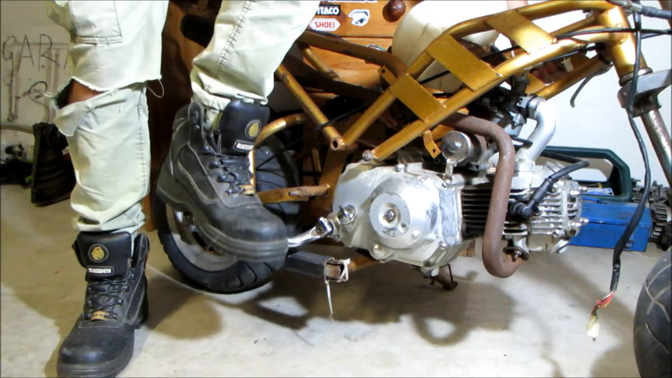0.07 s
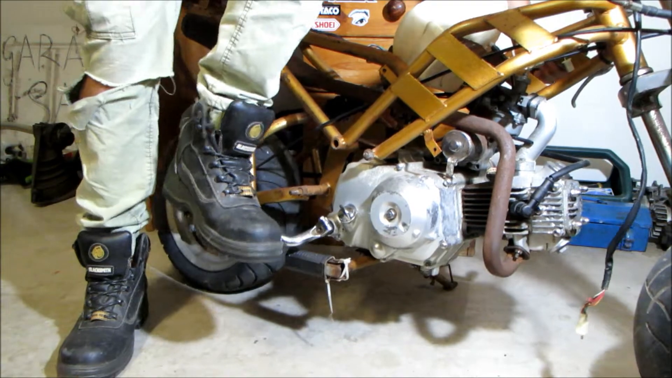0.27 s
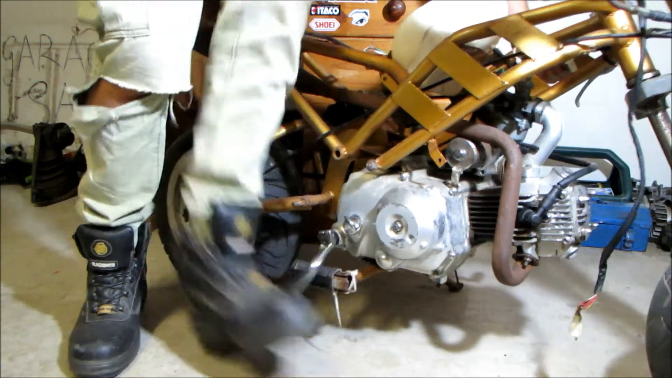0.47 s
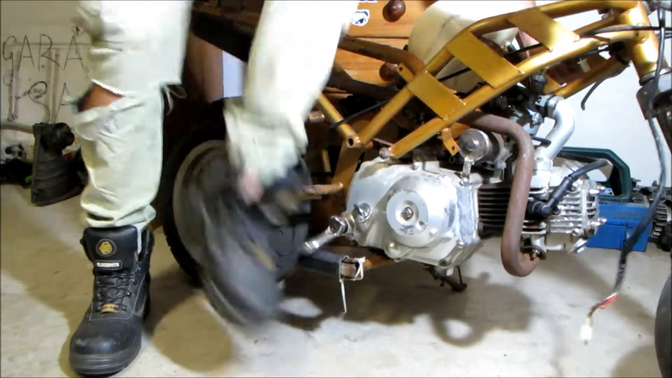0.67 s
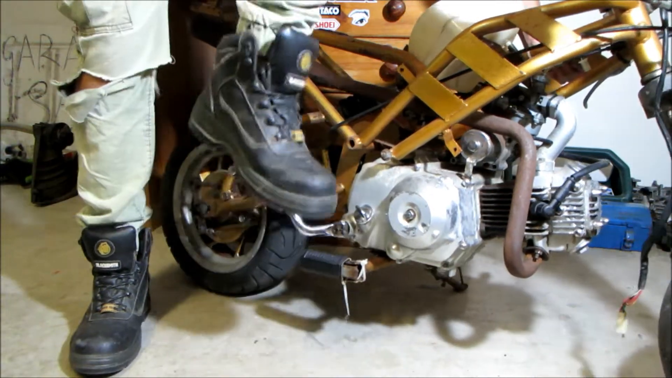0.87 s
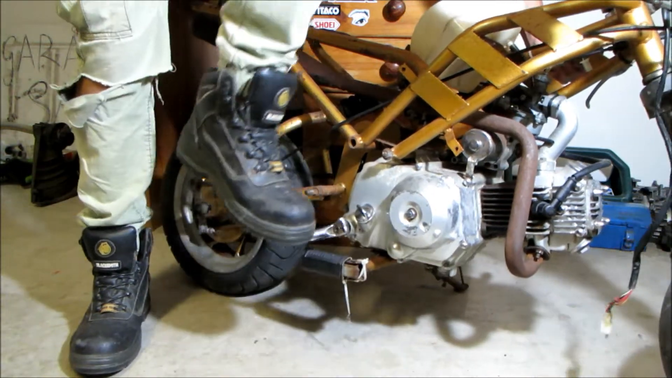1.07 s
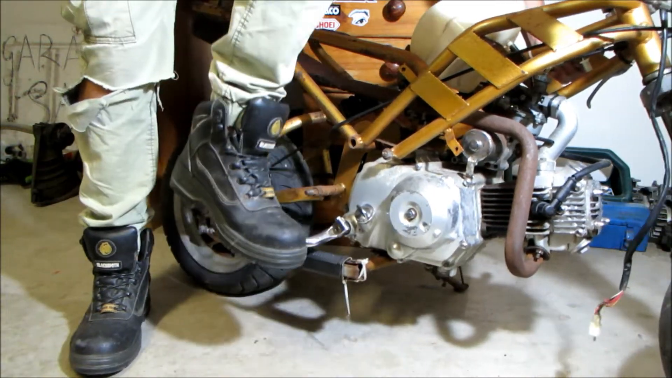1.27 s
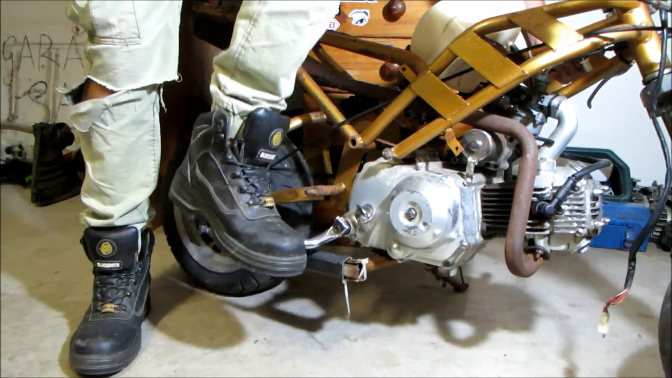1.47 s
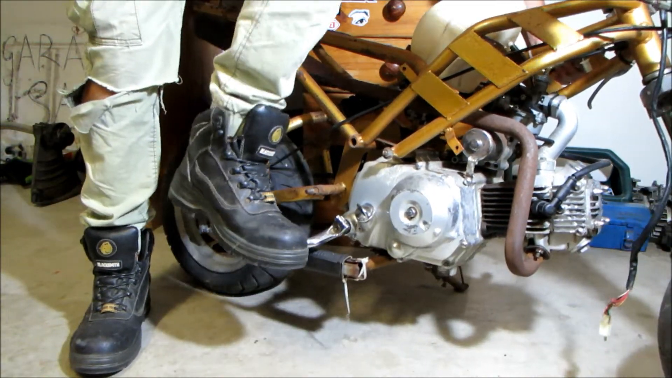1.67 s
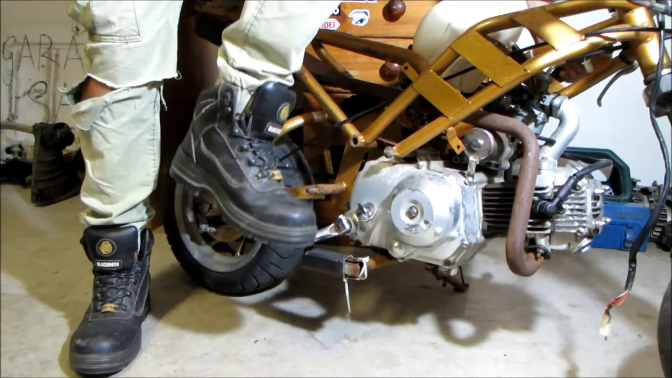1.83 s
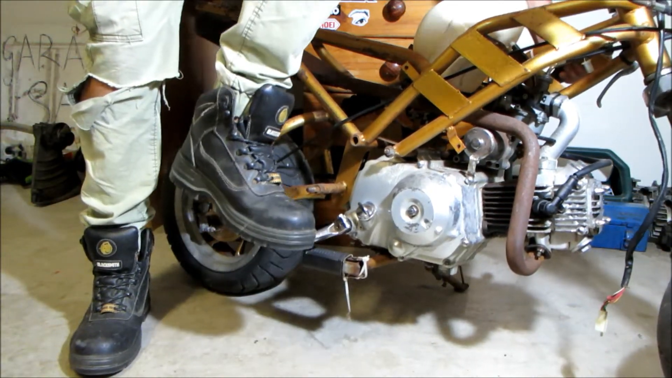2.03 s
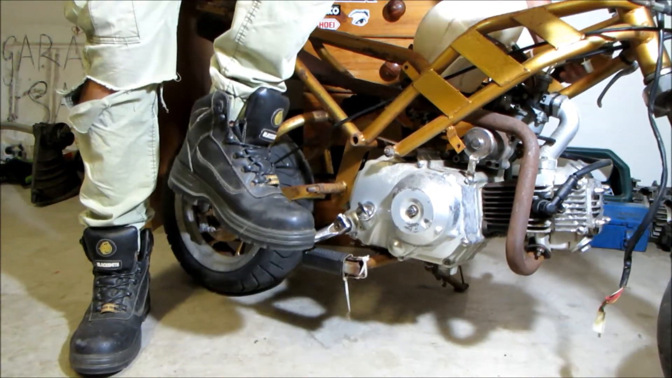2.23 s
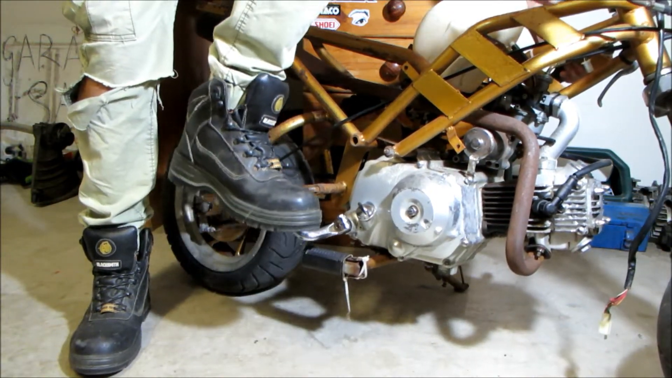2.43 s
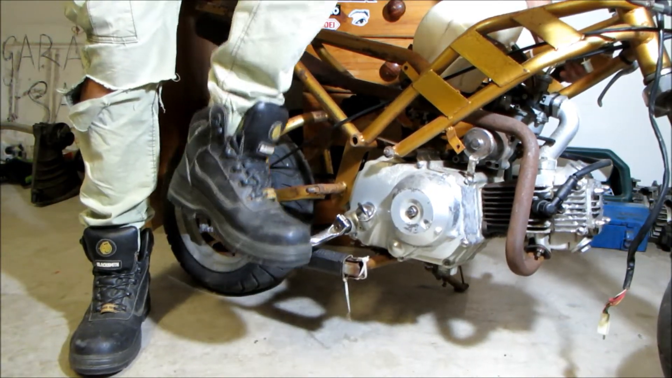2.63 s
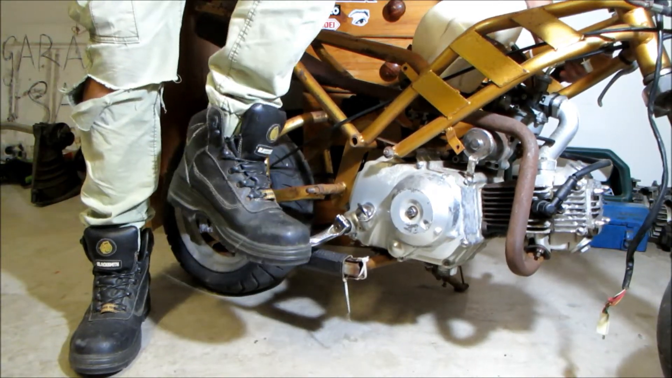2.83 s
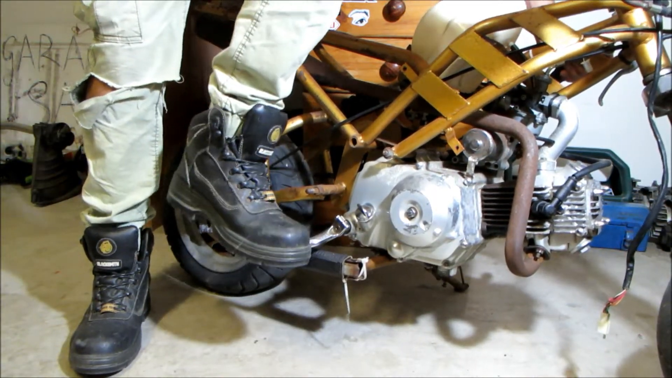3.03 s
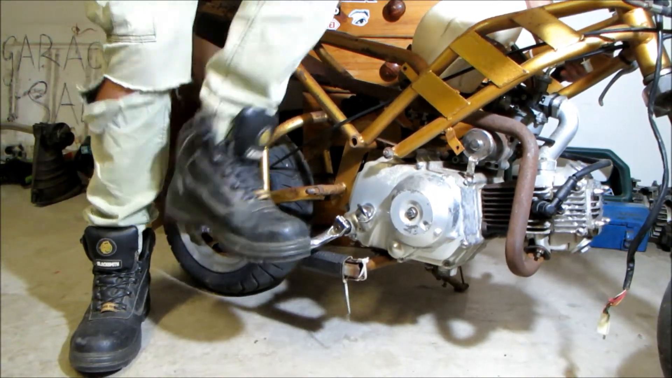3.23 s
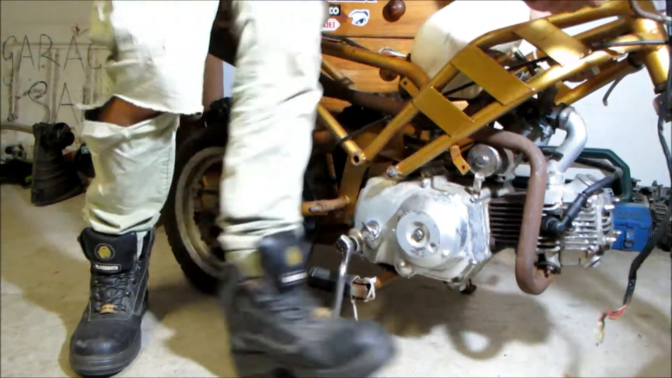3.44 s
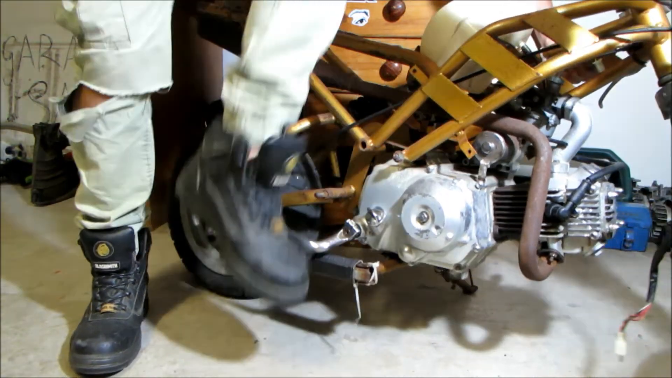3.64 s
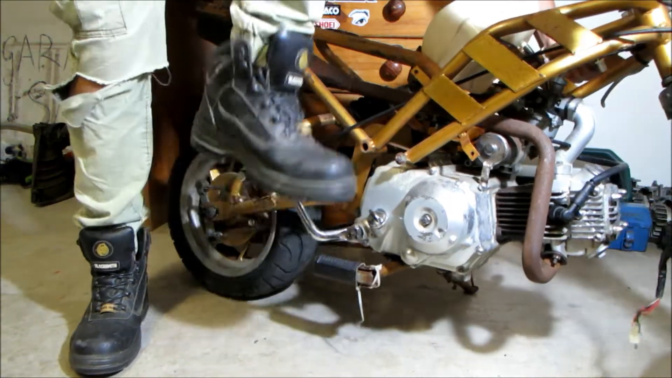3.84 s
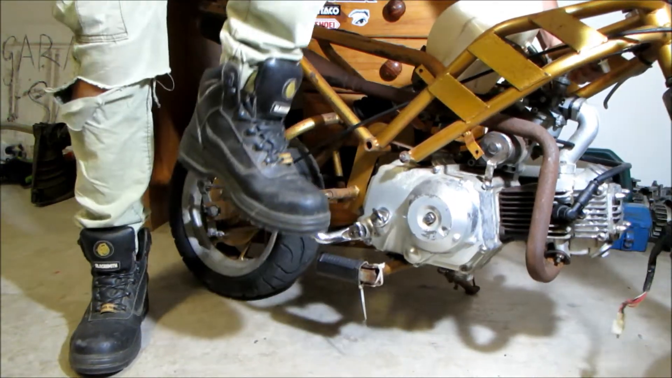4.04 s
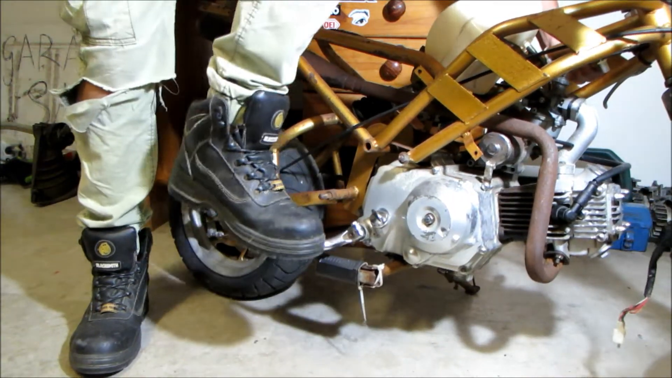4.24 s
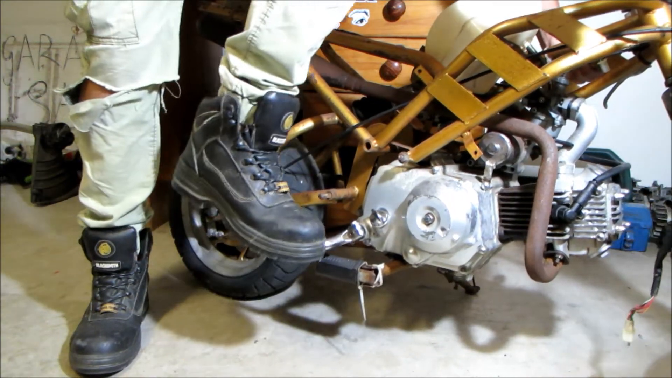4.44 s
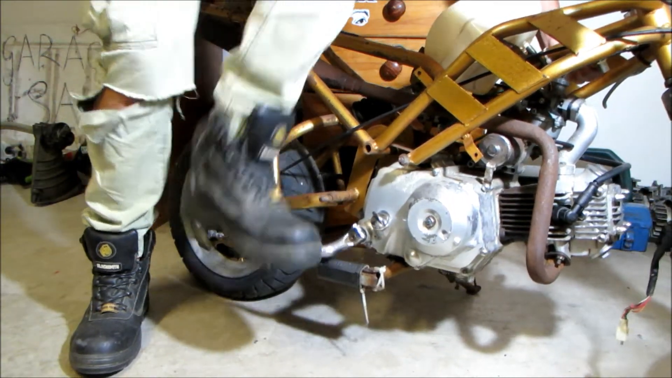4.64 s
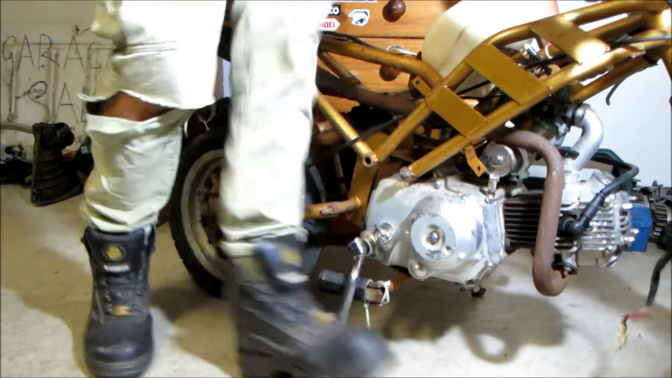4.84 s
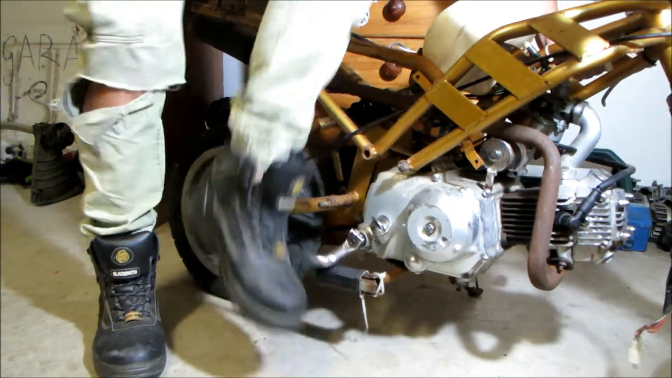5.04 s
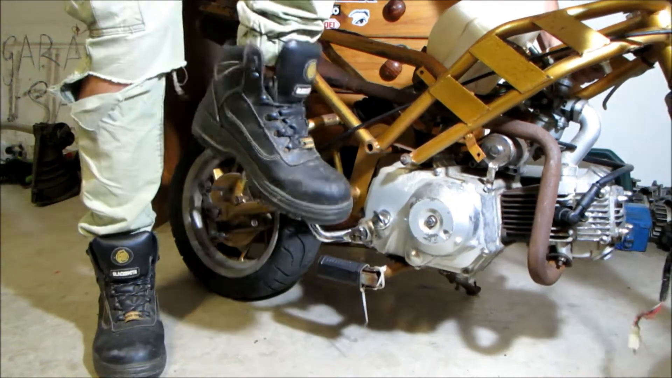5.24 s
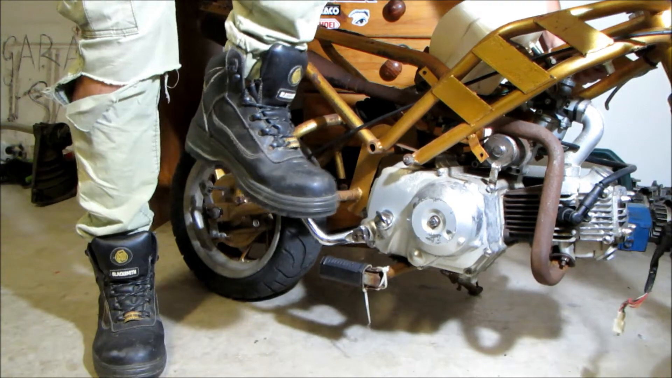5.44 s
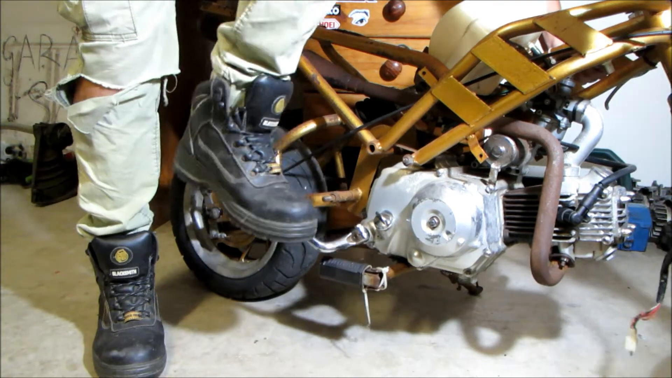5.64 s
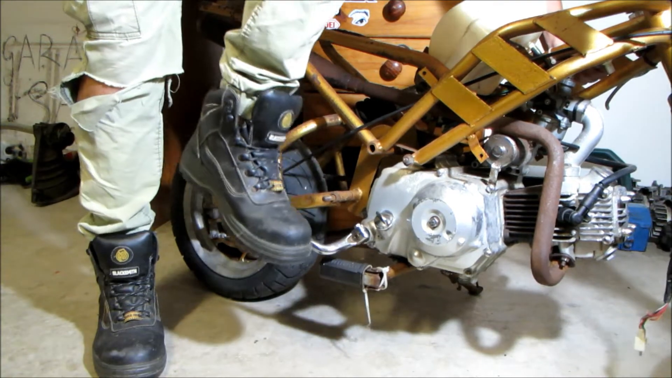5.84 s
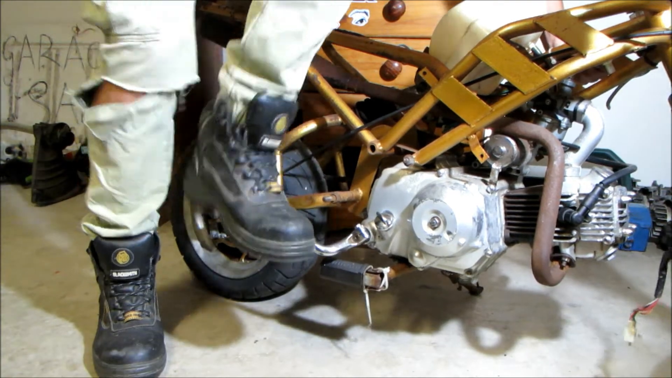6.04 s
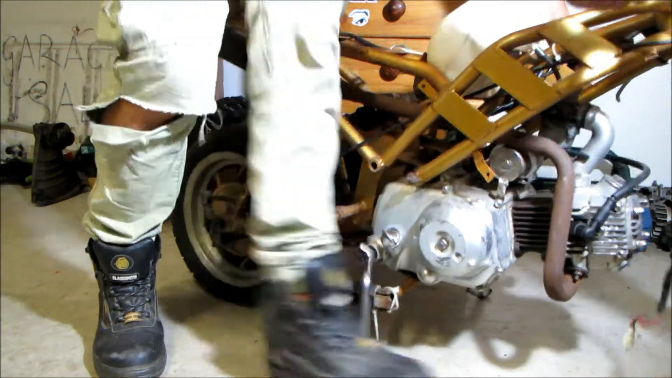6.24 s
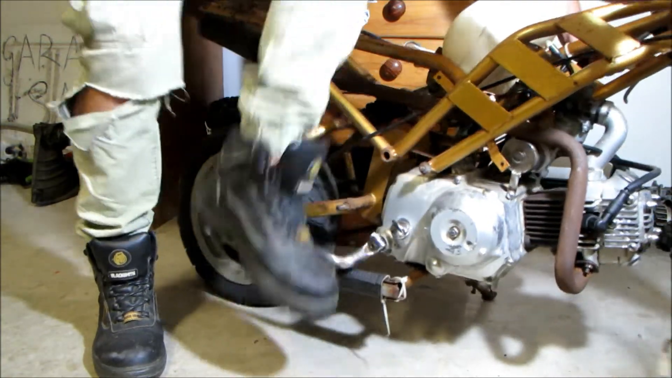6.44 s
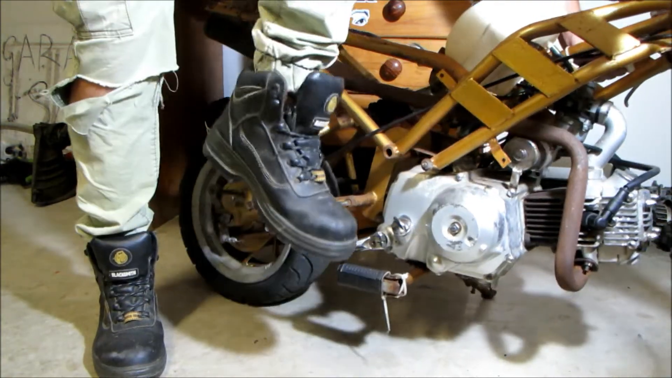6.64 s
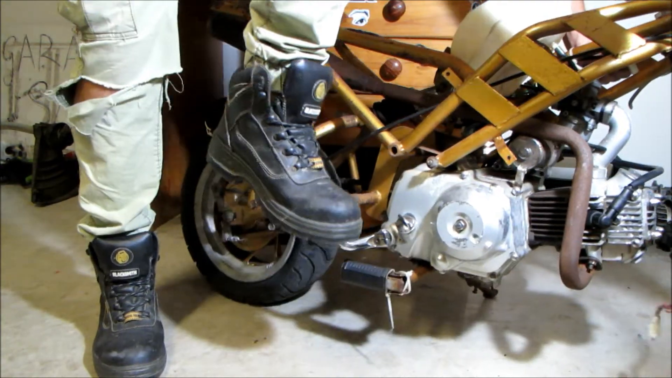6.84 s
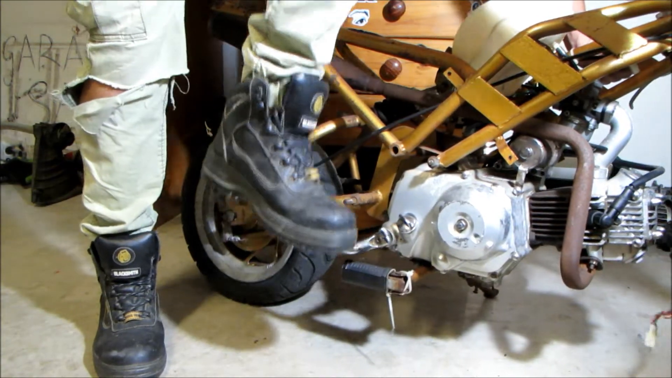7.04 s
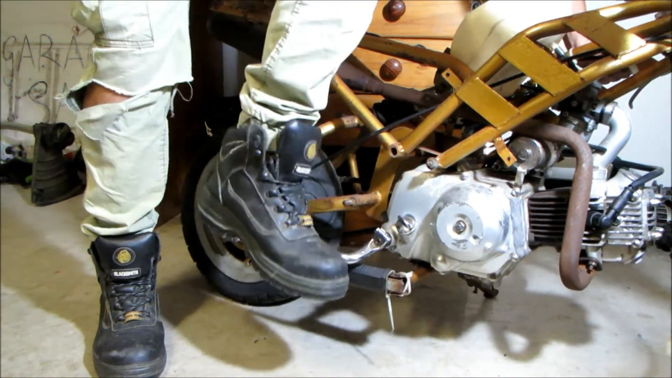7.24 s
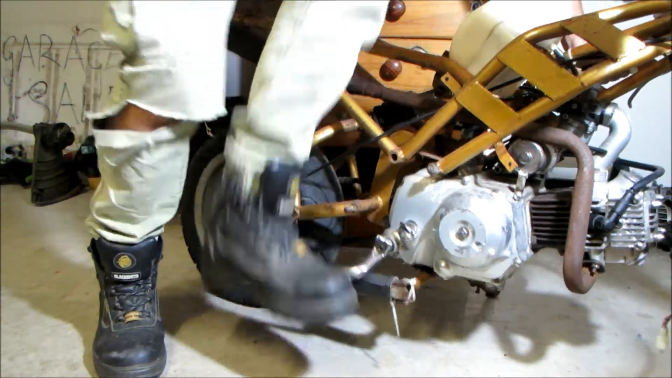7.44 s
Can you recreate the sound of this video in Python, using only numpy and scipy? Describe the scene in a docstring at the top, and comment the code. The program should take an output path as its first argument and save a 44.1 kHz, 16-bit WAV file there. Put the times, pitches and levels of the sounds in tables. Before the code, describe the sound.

Metal kick lever clacks, a little engine turns over with low slowing puffs, whirring gears and rapid ratchet clicks, then stops dead, four times

```python
"""In a shed, a small four-stroke pocket bike is kicked over four times and never fires.
Each kick: the lever takes up with a clack, the piston pumps a few slowing gulps of air (decaying low
tones and rushing noise), the gears whirr (grainy noise) and the starter ratchet clicks (noise snaps
through the crankcase modes); then the lever rattles back up. In the pause the boot shifts on the pedal."""
import sys
import numpy as np
from scipy import signal
from scipy.fft import rfft, irfft
from scipy.io import wavfile
from scipy.ndimage import map_coordinates

SR = 44100
rng = np.random.default_rng(int(sys.argv[2]) if len(sys.argv) > 2 else 0)


def int16_out(signal):
    """Quantize to a 16-bit WAV file."""
    q = np.round(np.clip(np.atleast_2d(signal).T, -1, 1) * 32767)
    wavfile.write(sys.argv[1], SR, q.astype(np.int16))


N = 330750
TIME = np.arange(N) / SR  # s
HZ = np.maximum(np.arange(4097) * SR / 8192, 1)  # frequency grid of the filters

# colour of the ratchet teeth: f/Hz, level/dB
TOOTH_COLOUR = [(300, -21.5), (900, -11), (1500, -2.5), (2100, -11.5), (2800, -3), (3700, -13),
                (4600, -2.5), (5800, 4), (8000, 3), (9500, 1.5), (11500, -9), (15500, -18)]
# crankcase modes: f/Hz, width/Hz, level over the broad colour/dB
CASE_MODES = [(521, 48, 0.5), (975.5, 25, 8), (1335, 4.7, 1), (1444, 28, 5.5), (2082, 29, 4),
              (2353, 34, 1.5), (2830, 23, -6.5), (4640, 69, -5), (5945, 66, 2), (7070, 40, 4.5),
              (7620, 120, 3), (9100, 30, -5)]


def ratchet(snap_db=-2.0, hold=0.0009, fade=0.0022, grit_db=-5.0, chatter_db=-19, chatter_fade=0.011):
    """Every tooth drops with the same sharp snap, its own grit and a brief chatter in the crankcase."""
    drops = teeth()
    one_snap = (bursts([(0, snap_db, hold, fade)], rise=.00012) * noise())[:SR // 32]
    snaps = convolve(strikes(drops), one_snap)
    grit = bursts([(s, db + grit_db, hold, fade) for s, db in drops], rise=0.00017)
    chatter = bursts([(s, db + chatter_db, hold, chatter_fade) for s, db in drops], rise=0.0027)
    return colour(snaps + (grit + chatter) * stereo_noise(), TOOTH_COLOUR, CASE_MODES)


TOOTH_SPREAD_DB = 1.5  # unevenness from tooth to tooth
# the ratchet overruns once a kick: from t/s, until t/s, first gap between teeth/s,
# shortening as it spins up/s, lengthening per tooth/s, first tooth level/dB, loss per tooth/dB
# (levels before the trims in ratchet)
OVERRUN_RUNS = [(.6637, .817, .0184, .0311, .00251, -16.5, .06),
                (3.5644, 3.79, .0239, .0314, .00202, -16.8, .17),
                (4.9669, 5.208, .0202, .0203, .00121, -16.8, .38),
                (6.379, 6.605, .0165, .0186, .00141, -17.6, .18)]


def teeth(count=24, spin_up_count=4):
    """Ratchet teeth (t/s, level/dB) crowd together on spin-up, then spread and weaken on the coast."""
    rows, k = [], np.arange(count)
    for start, end, first_gap, shortening, lengthening, first_db, loss_db in OVERRUN_RUNS:
        gaps = first_gap - shortening * (1 - np.exp(-k / spin_up_count)) + lengthening * k
        levels = first_db - loss_db * k + TOOTH_SPREAD_DB * rng.standard_normal(count)
        times = start + np.cumsum(gaps) - gaps
        rows += [(s, db) for s, db in zip(times, levels) if s < end]
    return rows


# the lever clacking as it takes up, returns or is nudged:
# t/s, body level/dB, bright edge level/dB, fading time/s (levels before the trims below)
LEVER_CLACKS = [(0.041, -46.5, -66, 0.0082), (.474, -33, -34, 0.0043), (1.0823, -33, -36, 0.0066),
                (1.2637, -42.5, -34, 0.004), (1.84, -55.5, -63.5, 0.0076), (2.048, -35, -39, .0085),
                (2.71, -46.5, -54, .0027), (3.303, -45, -54.5, 0.0092), (3.412, -23.5, -19, 0.005),
                (4.0647, -36, -37, .0027), (4.113, -39.5, -43, .0038), (4.803, -28, -30, 0.0059),
                (5.362, -44.5, -39, 0.0067), (5.8, -47.5, -58, 0.0068), (6.159, -30.5, -46, 0.00053),
                (6.267, -37.5, -41, .005), (6.97, -39, -42, 0.023), (7.1844, -35.5, -38, 0.0057)]
# the lever and its casing ringing on: f/Hz, level relative to the blow/dB, fading time/s
LEVER_RING = [(976, 3, .12), (1495, -2, 0.079), (2370, -1, .09), (5010, -6, .13), (5378, -5.5, .11),
              (6000, -3.5, 0.069), (6837, -5, 0.068), (7280, -4, .1), (8592, -9.5, .06)]
# colour of the knock: f/Hz, level/dB
CLACK_BODY_COLOUR = [(100, -17), (400, -5), (750, -7.5), (1100, -1), (1800, 0), (2300, -1.5), (2850, 1),
                     (3600, -13.5), (6000, -28)]
# colour of the bright edge, and of the leaking air: f/Hz, level/dB
CLACK_EDGE_COLOUR = [(1500, -13.5), (3800, -11), (5000, 3.5), (6200, 4.5), (7700, 0), (10000, -6.5),
                     (12000, -18), (15500, -19.5)]
# blows at the end stop, before the trims below
STOP_BODY_DB, STOP_EDGE_DB, STOP_FADE_S = -22, -22, .0035


def clacks(body_db=1.5, edge_db=2.0, hold=0.0012, graze_fade=0.01, ring_db=-23):
    """Steel on steel: a casing knock, a bright edge, faint lever ringing and a graze before each stop."""
    end_blows = [(s, STOP_BODY_DB, STOP_EDGE_DB, STOP_FADE_S) for s, *_ in END_STOPS]
    blows = LEVER_CLACKS + end_blows
    grazes = [(s - length, db, length / 2, graze_fade) for s, _, length, db in END_STOPS]
    knocks = [(s, low + body_db, hold, fade) for s, low, high, fade in blows]
    edges = [(s, high + edge_db, hold, fade) for s, low, high, fade in blows]
    body = bursts(knocks, rise=0.0013)
    edge = bursts(edges + grazes, rise=0.00014)
    ring_blows = strikes([(s, high + ring_db) for s, low, high, fade in LEVER_CLACKS])
    ring = convolve(ring_blows, ringing(LEVER_RING))
    knock = colour(body * noise(), CLACK_BODY_COLOUR, CASE_MODES)
    return knock + colour(edge * stereo_noise(), CLACK_EDGE_COLOUR, CASE_MODES) + ring


# the lever reaching the bottom of its travel:
# t/s, ping level/dB, length of the graze before it/s, graze level/dB
END_STOPS = [(0.62, -25.5, 0.013, -23), (3.515, -26, 0.0045, -35), (4.9234, -34, 0.015, -33),
             (6.338, -31, 0.027, -31.5)]


def stops(hz=2640, width=260, hold=0.0054, fade=0.011):
    """The lever strikes its end stop and the shaft pings: a burst of noise in one narrow resonance."""
    return bursts([(s, db, hold, fade) for s, db, *_ in END_STOPS], rise=0.00072) * narrow(hz, width)


# the pipe's pitch sags as the engine slows: Hz, and Hz per (cycle/s)
PIPE_HZ, PIPE_HZ_PER_SPEED = 82.9, 1.25
# colour of the rushing flow: f/Hz, level/dB
RUSH_COLOUR = [(30, -40), (55, -23.5), (75, -12.5), (135, -1.5), (270, 1), (390, -2), (520, -8), (800, -15),
               (2000, -37.5)]


def gulps(second_ratio=1.94, overtone_ratio=2.04, overtone_db=-5, pipe_fade=0.029, second_fade=0.015,
          pipe_rise=0.022, waver=0.23):
    """In each gulp the air column swings in two low modes with an overtone, and the flow rushes."""
    pipe, age, rows = np.zeros(N), TIME[:SR // 4], strokes()
    for s, length, speed, pipe_db, second_db, rush_db in rows:
        hz = PIPE_HZ + PIPE_HZ_PER_SPEED * speed
        first_level = from_db(pipe_db) * swell(age, pipe_rise, length, pipe_fade)
        first = first_level * np.sin(2 * np.pi * hz * age)
        phase = 2 * np.pi * second_ratio * hz * age
        second_level = from_db(second_db) * swell(age, 0.0036, length, second_fade)
        second = second_level * (np.sin(phase) + from_db(overtone_db) * np.sin(overtone_ratio * phase))
        start = round(s * SR)
        pipe[start:start + len(age)] -= first + second
    flow = bursts([(s, rush_db, length / 2, .016) for s, length, *_, rush_db in rows], rise=0.019)
    wavering = 1 + waver * narrow(28, 13)
    return np.sqrt(2) * pipe * wavering + colour(flow * noise(), RUSH_COLOUR)


GULP_S, FIRST_GULP_S = 0.04, 0.033
# the kicks: lever takes up t/s, first gulp t/s, engine speed/(cycles/s), whirr under the push level/dB,
# rumble under the push level/dB, first gulp level/dB, whine level/dB, casing ring level/dB
# (whine and ring before the trims in gears)
KICK_ROWS = [(.474, .568, 10.642, -52, -44, -28, -31, -28),
             (3.412, 3.481, 10.139, -39.5, -36, -24, -30.5, -42),
             (4.803, 4.870, 10.844, -48, -40, -33, -29, -42.5),
             (6.158, 6.278, 11.283, -53, -40.5, -33, -35, -45)]
# later gulps by engine speed: speed/(cycles/s), pipe level/dB, second mode level/dB, rush level/dB
LATER_GULPS = [(5, -40.5, -48.5, -38), (7.5, -39.5, -45, -47.5), (9.5, -37, -39.5, -45.5)]


def strokes(second_db=-2, rush_db=3.5):
    """Gulps, one a cycle: the boot drives the first, the rest follow the engine's speed."""
    # rows: t/s, length/s, speed/(cycles/s), pipe level/dB, second mode level/dB, rush level/dB
    rows, (speeds, *levels) = [], np.transpose(LATER_GULPS)
    for _, start, speed, _, _, db, *_ in KICK_ROWS:
        rows.append((start, FIRST_GULP_S, speed, db, db + second_db, db + rush_db))
        for s, now in cycles(start, speed)[1:]:
            rows.append((s, GULP_S, now, *(np.interp(now, speeds, column) for column in levels)))
    return rows


FRICTION, STALL_SPEED = 13.125, 4.1  # cycles/s lost per second, cycles/s


def cycles(start, speed):
    """Friction slows the engine evenly until it stalls against compression: t/s and speed per cycle."""
    speeds = np.sqrt(np.arange(speed ** 2, STALL_SPEED ** 2, -2 * FRICTION))
    return [(start + (speed - now) / FRICTION, now) for now in speeds]


LEAK_BELOW_SPEED, LEAK_AFTER_CYCLES = 7.2, .32  # cycles/s, cycles after the gulp
LEAK_S, LEAK_DB = 0.041, -40


def leaks(rise=0.01, fade=0.0099):
    """Air squeezed past the slowing piston as it climbs against compression: a short hiss."""
    slow = [(s + LEAK_AFTER_CYCLES / speed, LEAK_DB, LEAK_S, fade)
            for s, _, speed, *_ in strokes() if speed < LEAK_BELOW_SPEED]
    return colour(bursts(slow, rise) * noise(), CLACK_EDGE_COLOUR)


# colour of the gear whirr: f/Hz, level/dB
WHIRR_COLOUR = [(500, -27.5), (900, -2), (1200, 3), (1800, 1.5), (2800, -0.5), (3700, -20), (5500, -4),
                (8000, -9.5), (11000, -11.5), (15500, -28.5)]
# colour of the low gear rumble, and of the boot's scuffs: f/Hz, level/dB
RUMBLE_COLOUR = [(60, -18), (150, 1), (260, 1.5), (420, 0.5), (530, 0), (680, -6.5), (900, -3.5),
                 (1500, -23.5)]


def gears(whine_db=-5.0, whine_after=0.15, whine_width=0.04, ring_db=-5.5, ring_after=0.23, ring_width=.065,
          push_ring_db=-2.5, drone_db=-46.5, drone_after=0.18, drone_width=0.099):
    """Gear teeth and cam chain patter on the casing; the gears whine and two low casing modes sing."""
    take_ups, starts, _, push_whirr, push_rumble, _, whines, rings = np.transpose(KICK_ROWS)
    whirr = drive(push_whirr, spin_db=-40, spin_after=0.17, spin_width=0.093,
                  coast_db=-46.5, coast_fade=0.055, push_fade=0.014)
    rumble = drive(push_rumble, spin_db=-43.5, spin_after=.17, spin_width=.12,
                   coast_db=-51, coast_fade=0.12, push_fade=0.067)
    patter = whirr * grain(per_s=600, spread_db=4.5, fade=0.00092) * noise()
    whine = hump(zip(starts, whines + whine_db), whine_after, whine_width) * narrow(1468, 190)
    loaded = bursts([(s, db + push_ring_db, .02, .15) for s, db in zip(take_ups, push_whirr)], rise=.008)
    spinning = hump(zip(starts, rings + ring_db), ring_after, ring_width)
    ring = (loaded + spinning) * narrow(983.6, 40)
    drone = hump([(s, drone_db) for s in starts], drone_after, drone_width) * narrow(528, 22)
    low = colour(rumble * noise(), RUMBLE_COLOUR, CASE_MODES)
    return colour(patter, WHIRR_COLOUR, CASE_MODES) + low + whine + ring + drone


def drive(push_levels, spin_db, spin_after, spin_width, coast_db, coast_fade, push_fade, quiet_speed=4.6):
    """Gear noise level: steady under the push, a swell after the first gulp, a lingering coast."""
    push = [(take_up, db, start - take_up, push_fade)
            for (take_up, start, *_), db in zip(KICK_ROWS, push_levels)]
    coast = [(start, coast_db, (speed - quiet_speed) / FRICTION, coast_fade)
             for _, start, speed, *_ in KICK_ROWS]
    spin = hump([(start, spin_db) for _, start, *_ in KICK_ROWS], spin_after, spin_width)
    return bursts(push, rise=.012) + bursts(coast, rise=.05) + spin


# the boot leans on the pedal around each take-up (level before the trim below)
LEAN_ON_S, LEAN_ON_DB = 0.0083, -53
# the lever scraping round on its shaft; the long row at 2.808 s is a very faint grainy noise
# through the pause: t/s, length/s, level before the trim below/dB
GRAINY_SCRAPES = [(0, 0.053, -53), (1.076, 0.17, -40.5), (2.638, 0.064, -57), (2.699, 0.021, -55),
                  (2.808, 0.93, -74), (4.064, 0.085, -40), (5.361, 0.15, -42.5), (6.99, 0.055, -37.5),
                  (7.182, 0.069, -55)]
# colour of the scraping: f/Hz, level/dB
SCRAPE_COLOUR = [(80, -33.5), (220, -3), (350, -6), (500, -2.5), (680, -8), (1000, -4), (1500, -1.5),
                 (2100, -0.5), (2900, -4.5), (3800, -18), (5500, -9), (8000, -11.5), (11000, -23),
                 (15500, -37.5)]


def lever(scrape_db=-2.5, rise=0.005, fade=0.074):
    """The lever grates in small uneven slips, noise in tiny contacts; a very faint grain fills the pause."""
    scraping = bursts([(s, db, length, fade) for s, length, db in GRAINY_SCRAPES], rise)
    leaning = hump([(take_up, LEAN_ON_DB) for take_up, *_ in KICK_ROWS], 0, LEAN_ON_S)
    grains = (scraping + leaning) * grain(per_s=460, spread_db=-0.5, fade=0.0027) * noise()
    return from_db(scrape_db) * colour(grains, SCRAPE_COLOUR, CASE_MODES)


# the boot sole bumping the pedal: t/s, level before the trim below/dB
BOOT_THUMPS = [(.070, -43.5), (0.488, -39.5), (6.159, -29.5), (6.173, -35), (7.19, -47.5)]
# the frame answering those bumps: f/Hz, level relative to the bump/dB, fading time/s
FRAME_MODES = [(160, -13, 0.019), (247, -4.5, .010), (315, -3, 0.005), (435, -4, 0.0042),
               (521, -23, 0.0098)]
# the sole dragging on the pedal: t/s, length/s, level/dB
BOOT_SCUFFS = [(2.066, .013, -55), (2.333, 0.043, -60.5), (2.724, 0.09, -50), (3.306, .059, -47),
               (3.362, 0.074, -41.5), (4.752, 0.054, -50.5), (7.177, 0.093, -52.5)]


def boot(thump_db=5.0, scuff_fade=0.017):
    """The rubber sole sets the low modes of the frame thumping, and scuffs dully as it shifts."""
    scuffs = bursts([(s, db, length, scuff_fade) for s, length, db in BOOT_SCUFFS], rise=0.006) * noise()
    thumps = from_db(thump_db) * convolve(strikes(BOOT_THUMPS), ringing(FRAME_MODES))
    return thumps + colour(scuffs, RUMBLE_COLOUR, CASE_MODES)


# time for the echoes to fall 60 dB: f/Hz, t/s
SHED_DECAY = [(100, 0.86), (250, 0.45), (550, 0.65), (1400, 0.99), (2500, 1), (5500, 0.81), (9000, 0.52),
              (15000, 0.32)]
# echo level over the direct sound: f/Hz, level/dB
SHED_LEVEL = [(100, -16), (200, -18), (350, -3.5), (700, -6), (1500, -0.5), (3000, -1.5), (6000, -5),
              (10000, -5.5), (15000, -11)]


def shed(x, first_echo=0.0047):
    """Diffuse echoes build up over a few milliseconds and die at their own rate in each band."""
    age, scatter, tail = TIME[:SR], stereo_noise()[:, SR:2 * SR], 0
    centres = np.geomspace(60, 16000, 12)  # Hz
    log_hz, spectrum = np.log(np.maximum(np.arange(SR // 2 + 1), 1)), rfft(scatter)
    for hz, own in zip(centres, np.eye(len(centres))):
        band = irfft(spectrum * np.interp(log_hz, np.log(centres), own), SR)
        build_up = 1 - np.exp(-(age / first_echo) ** 2)
        decay = from_db(-60 * age / at_hz(SHED_DECAY, hz)) * build_up
        tail = tail + from_db(at_hz(SHED_LEVEL, hz)) * band * decay / np.sqrt(np.sum(decay ** 2))
    return convolve(x, tail)


# colour of the quiet background: f/Hz, level/dB
AIR_COLOUR = [(18, -54), (30, -26.5), (97, -2.5), (260, -5.5), (645, -6), (716, 1.5), (859, -12.5),
              (1090, -3), (1690, -11), (2770, -24.5), (3780, -41.5), (4650, -27), (7240, -27.5),
              (12800, -36.5), (15000, -51)]
# faint steady resonances of the shed: f/Hz, width/Hz, rms level/dB
SHED_HUM = [(101, 50, -67.5), (1089, 65, -69)]


def still_air(air_db=-59.5):
    """The quiet of the shed: steady coloured noise and faint narrow resonances."""
    hum = sum(from_db(db) * narrow(hz, width) for hz, width, db in SHED_HUM)
    return from_db(air_db) * colour(stereo_noise(), AIR_COLOUR) + hum


# how alike left and right are: f/Hz, likeness/(0 to 1)
STEREO_LIKENESS = [(100, 0.32), (300, 0.71), (500, 0.49), (800, 0.37), (2000, 0.67), (3300, 0.71),
                   (5500, 0.073), (9000, 0.29), (15000, 0.033)]


def stereo_noise():
    """White noise at two close microphones: partly alike at most pitches, least so in the high treble."""
    alike = np.clip(at_hz(STEREO_LIKENESS, HZ), -.9, .998)
    mid, side = (convolve(noise(), causal(np.sqrt(1 + sign * alike))) for sign in (1, -1))
    return rms_one(mid + side * [[1], [-1]])


def noise():
    """White noise; rms 1."""
    return rng.standard_normal(N)


def narrow(hz, width):
    """Noise ringing in one resonance; rms 1."""
    r = np.exp(-np.pi * width / SR)
    poles = [1, -2 * r * np.cos(2 * np.pi * hz / SR), r * r]
    return rms_one(signal.lfilter([1], poles, signal.lfilter([1, 0, -1], poles, noise())))


def grain(per_s, spread_db, fade):
    """Envelope of many tiny uneven contacts; rms 1."""
    strengths = from_db(spread_db * np.minimum(rng.exponential(1, N), 4))
    contacts = (rng.random(N) < per_s / SR) * strengths ** 2
    power = signal.lfilter([1], [1, -np.exp(-2 / (fade * SR))], contacts + 1e-18)
    return rms_one(np.sqrt(power))


def strikes(rows):
    """One impulse for each event (t/s, level/dB)."""
    out = np.zeros(N)
    out[[round(s * SR) for s, db in rows]] = from_db([db for s, db in rows])
    return out


def ringing(modes):
    """The answer of modes (f/Hz, level/dB, fading time/s) to one blow: decaying sines of alternate sign."""
    age = TIME[:SR]
    return sum((-1) ** k * from_db(db) * np.exp(-age / fade) * np.sin(2 * np.pi * hz * age)
               for k, (hz, db, fade) in enumerate(modes))


def bursts(rows, rise):
    """Envelope of events (t/s, level/dB, hold/s, fading time/s)."""
    out, age = np.zeros(N), TIME[:SR]
    for s, db, hold, fade in rows:
        start = max(round(s * SR), 0)
        out[start:start + len(age)] += from_db(db) * swell(age, rise, hold, fade)[:N - start]
    return out


def swell(age, rise, hold, fade):
    """A quick rise, a hold and an exponential fall."""
    return (1 - np.exp(-age / rise)) * np.exp(-np.maximum(age - hold, 0) / fade)


def hump(rows, delay, width):
    """Envelope of smooth rises and falls, each peaking a delay after its event (t/s, level/dB)."""
    return sum(from_db(db) * np.exp(-.5 * ((TIME - s - delay) / width) ** 2) for s, db in rows)


def colour(x, spectrum, modes=()):
    """Shape a white sound by a broad spectrum with resonances on top, keeping its power."""
    low_edge, high_edge = spectrum[0][0] / 2, spectrum[-1][0] * 2  # Hz, roll-offs beyond the table
    gain = from_db(at_hz(spectrum, HZ)) / np.hypot(1, low_edge / HZ) / np.hypot(1, HZ / high_edge)
    peaks = sum(from_db(db) ** 2 / (1 + (2 * (HZ - hz) / width) ** 2) for hz, width, db in modes)
    return convolve(x, causal(rms_one(gain * np.sqrt(1 + peaks))))


def causal(gain):
    """The minimum-phase impulse response with these gains on the HZ grid."""
    cepstrum = irfft(np.log(gain + 1e-9))
    half = len(cepstrum) // 2
    cepstrum[1:half] *= 2
    cepstrum[half + 1:] = 0
    return irfft(np.exp(rfft(cepstrum)))[:half]


def convolve(x, response):
    """Pass a sound through an impulse response."""
    return signal.oaconvolve(np.atleast_2d(x), np.atleast_2d(response), axes=-1)[:, :N]


def at_hz(points, hz):
    """Read a (f/Hz, value) table on a log-frequency axis."""
    return np.interp(np.log(hz), np.log(np.array(points)[:, 0]), np.array(points)[:, 1])


def from_db(db):
    """Decibels to gain."""
    return 10 ** (np.asarray(db) / 20)


def rms_one(x):
    """Scale to unit power."""
    return x / np.sqrt(np.mean(x ** 2) + 1e-20)


def scene():
    """The bike close by, its echoes and the quiet of the shed."""
    bike = ratchet() + clacks() + stops() + gulps() + leaks() + gears() + lever() + boot()
    return bike + shed(bike) + still_air()


CUTOFF_HZ = 16000
# colour of the left microphone port against the right: f/Hz, left over right level/dB
PORT_BALANCE = [(60, 2.5), (200, 1.25), (550, -0.5), (800, -2.2), (1200, 6), (1750, 3.5), (2700, 0),
                (4200, 1.5), (7000, 1.5), (9800, -0.1), (13000, -9)]


def record(dry, lag=0.65, top=.33):
    """Each port has its colour, left lags by part of a sample; peaks are rounded, the top is cut."""
    ports = [causal(from_db(sign * at_hz(PORT_BALANCE, HZ) / 2)) for sign in (1, -1)]
    left, right = convolve(dry, ports)
    heard = np.array([map_coordinates(left, [np.arange(N) - lag], order=3), right])
    rounded = heard / (1 + (heard / top) ** 4) ** (1 / 4)
    return signal.sosfilt(signal.ellip(10, .1, 80, CUTOFF_HZ, fs=SR, output="sos"), rounded)


dry = scene()
out = record(dry)
int16_out(out)
```